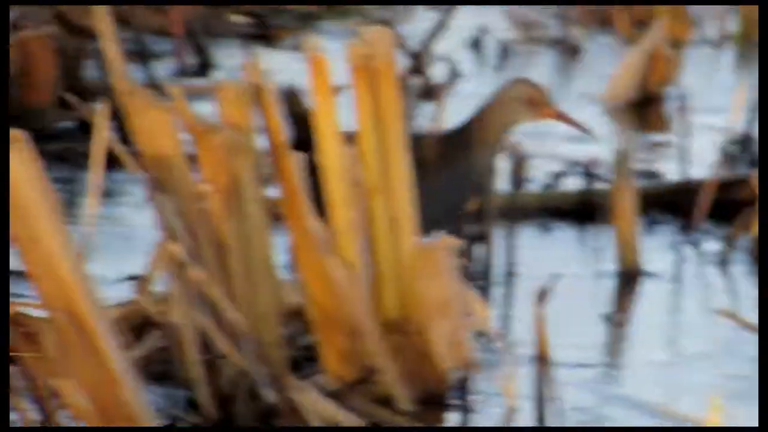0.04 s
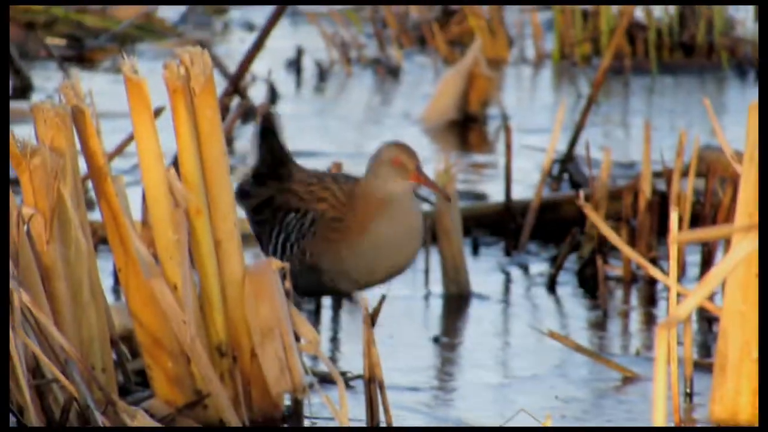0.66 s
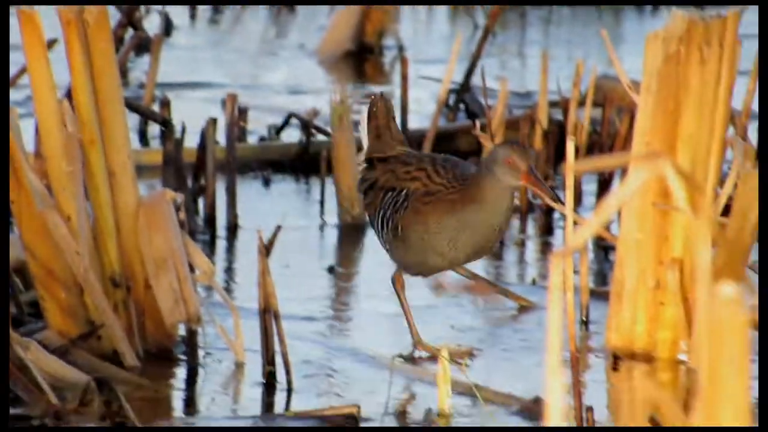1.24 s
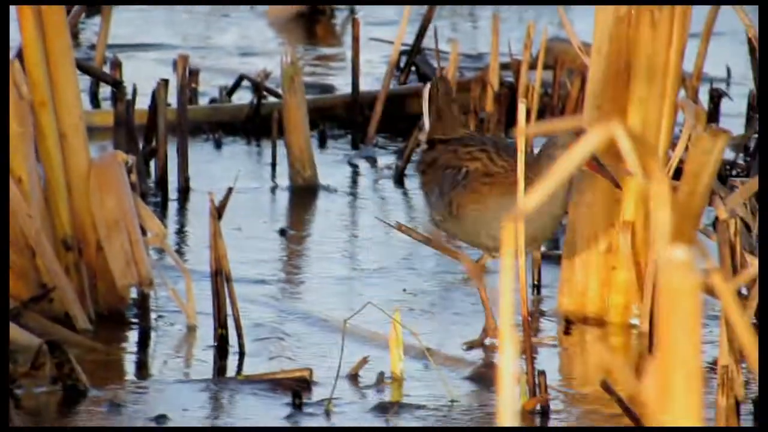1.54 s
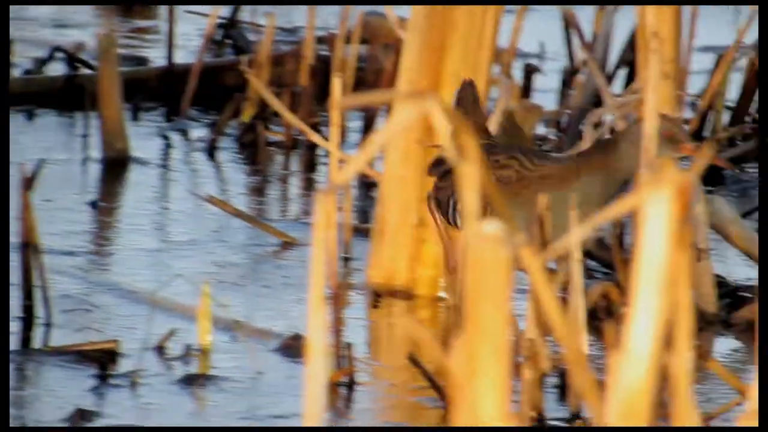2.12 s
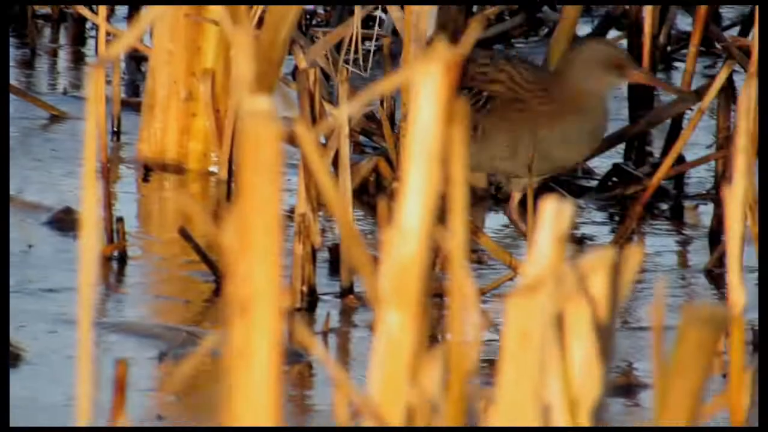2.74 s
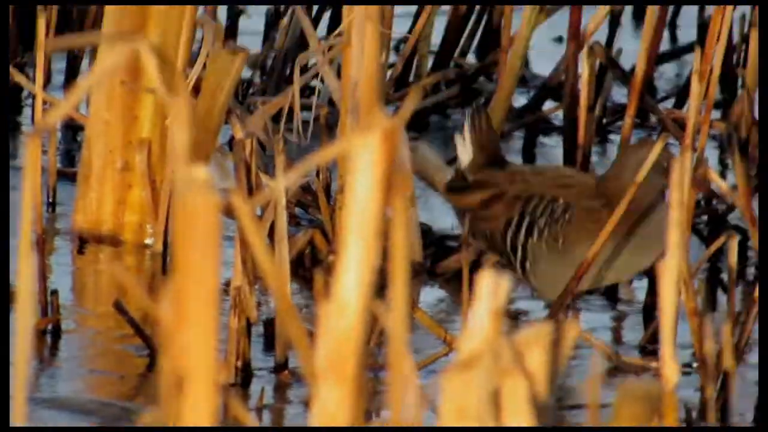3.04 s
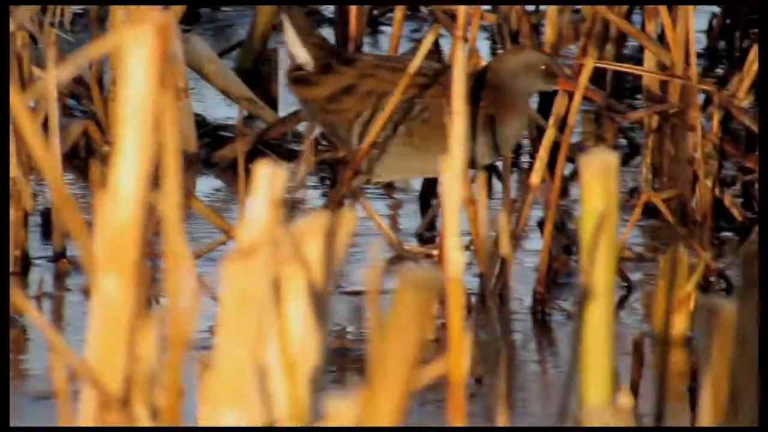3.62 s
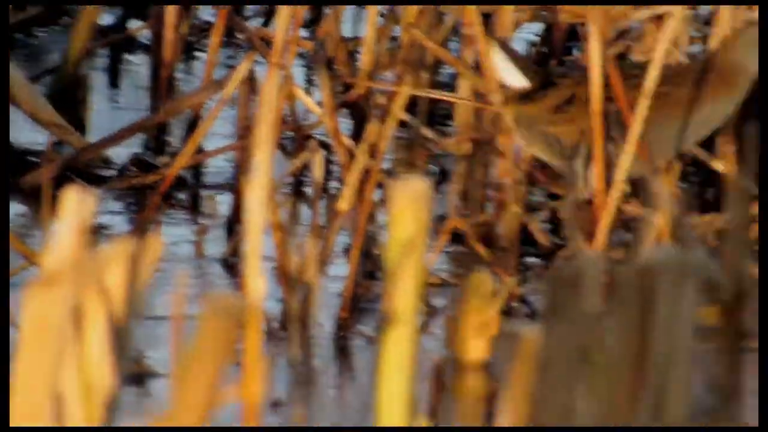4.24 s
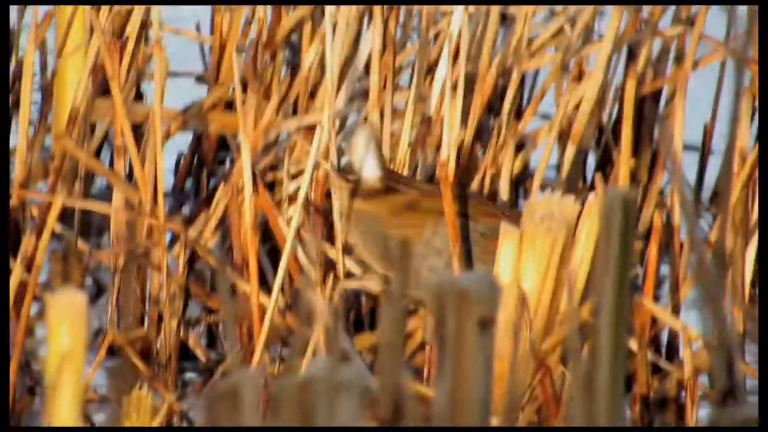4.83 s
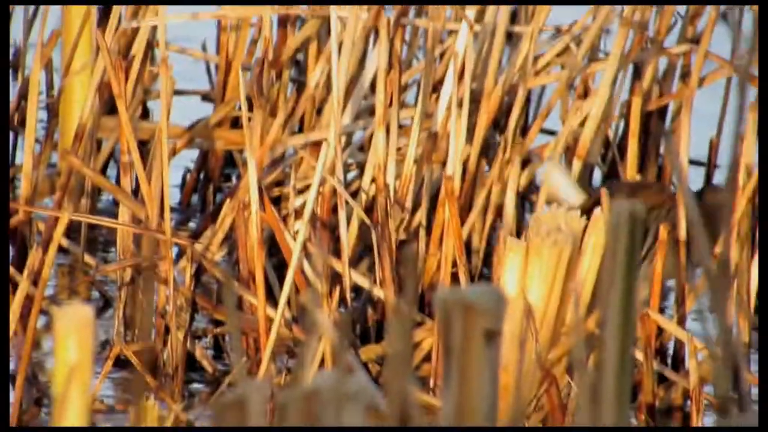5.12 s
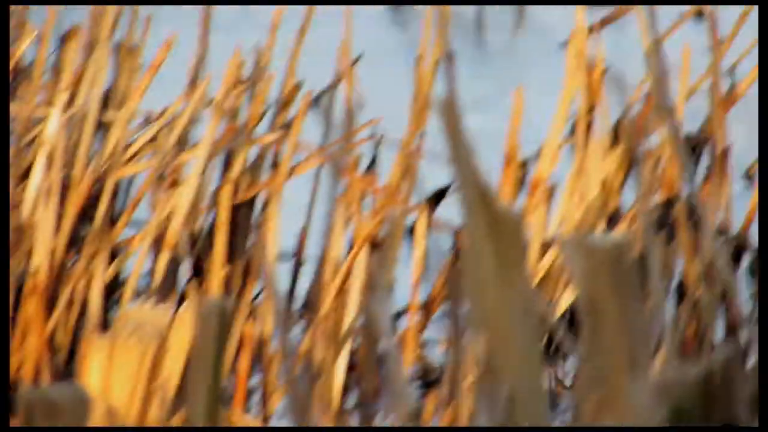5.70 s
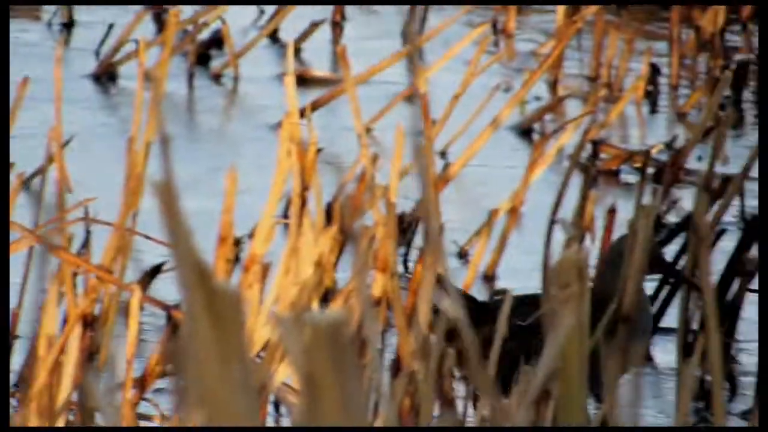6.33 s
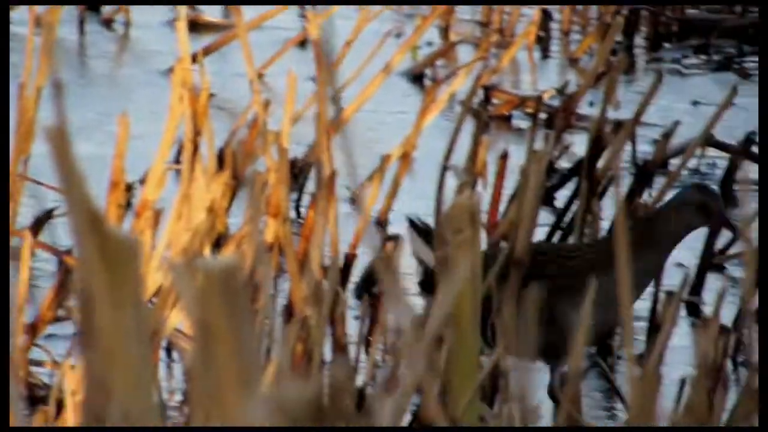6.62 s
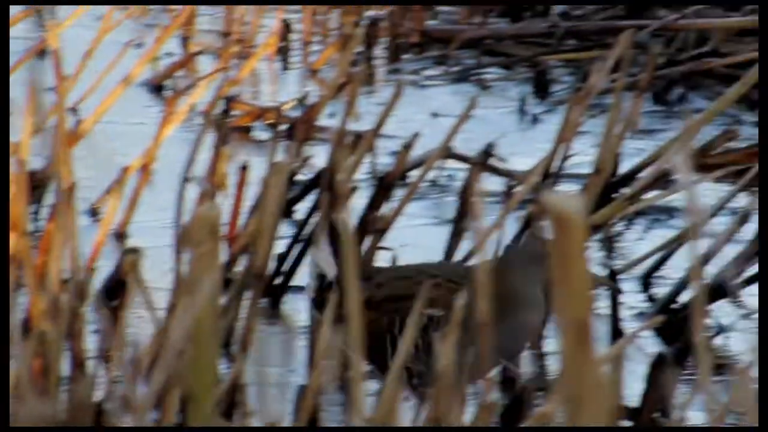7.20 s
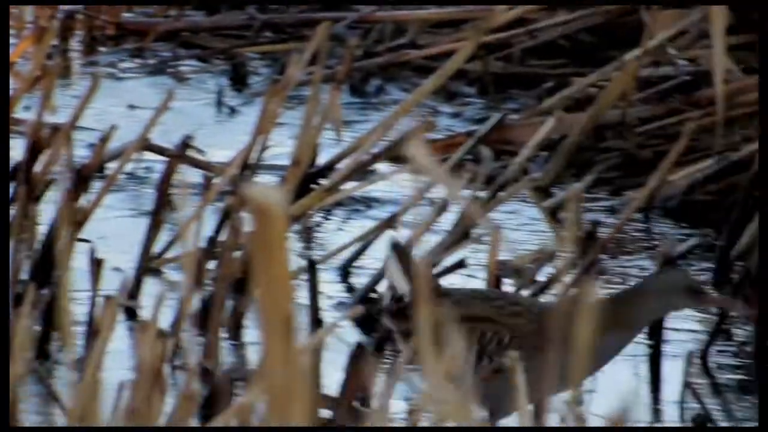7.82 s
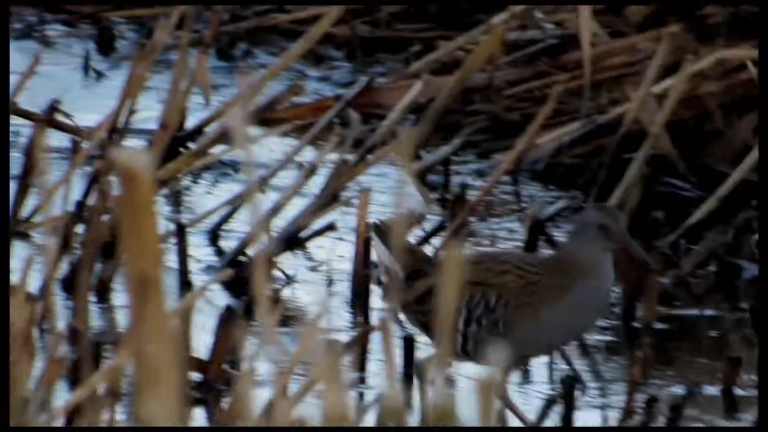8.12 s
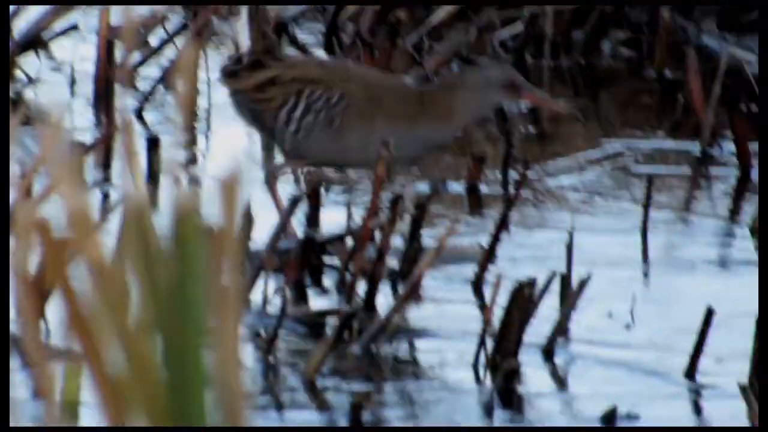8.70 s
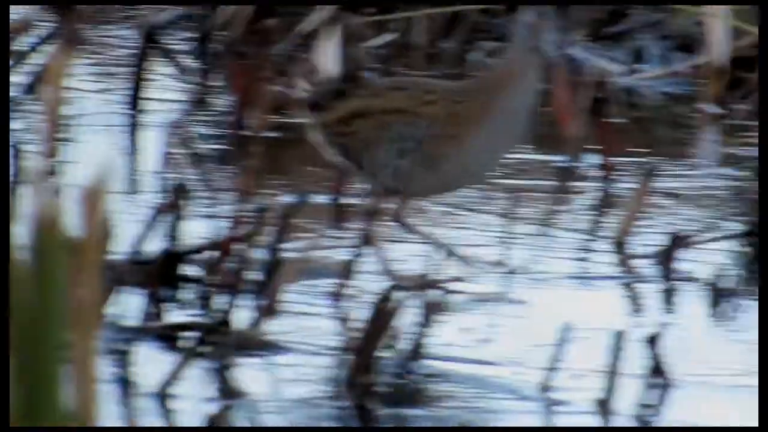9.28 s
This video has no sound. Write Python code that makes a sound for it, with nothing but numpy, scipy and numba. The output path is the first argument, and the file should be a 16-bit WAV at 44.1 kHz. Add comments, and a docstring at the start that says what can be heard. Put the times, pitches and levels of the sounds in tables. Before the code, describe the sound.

Gusty wind buffets the bare microphone of a hand-held camera at the edge of a reed bed. Low, fluttering rumbles and thumps come in uneven bursts, the hardest overloading with sharp cracks. The wind builds in the middle, drops briefly, then returns in close gusts. Underneath are faint hiss, a dull wash of open country, a few dry finger clicks, two soft rustles and barely audible far bird chips.

```python
"""The edge of a reed bed: gusty wind blows over the bare stereo microphone of a hand-held camera.
Eddies push the two ports in opposite directions, smaller and faster in a gust; the hardest ones
overload and crack. Underneath lie microphone hiss, a distant murmur of open country, a few far bird
chips, a lens motor, two brief rustles and the clicks of fingers on the camera."""
import sys
import numpy as np
from scipy import signal
from scipy.fft import rfft, irfft, next_fast_len
from scipy.io import wavfile
from scipy.ndimage import uniform_filter1d
from numba import njit

SR = 44100
rng = np.random.default_rng(int(sys.argv[2]) if len(sys.argv) > 2 else 0)


def dump_mix(stems):
    """Bounce the given channels to the path in sys.argv[1] as a 16-bit WAV at rate SR."""
    frames = np.atleast_2d(stems).T  # one column per channel
    limited = np.clip(frames, -1, 1)  # hard clip at full scale
    pcm = np.round(limited * 32767).astype(np.int16)
    wavfile.write(sys.argv[1], SR, pcm)


N = 421155
TIME = np.arange(N) / SR
APART = np.array([[1], [-1]])  # opposite signs left and right


def undb(db):
    """Decibels to gain."""
    return 10 ** (np.asarray(db) / 20)


def unit(x):
    """Scale to rms 1."""
    return x / np.sqrt(np.mean(x ** 2))


def colour(x, points):
    """EQ by a curve of (freq_hz, gain_db) points."""
    hz, db = np.transpose(points)
    size = next_fast_len(x.shape[-1])
    bin_hz = np.maximum(np.arange(size // 2 + 1) * SR / size, 1)
    gain = undb(np.interp(np.log(bin_hz), np.log(hz), db))
    return irfft(rfft(x, size) * gain, size)[..., :x.shape[-1]]


def wander(rate_hz):
    """Smooth random drift with rms 1."""
    step = int(SR / rate_hz)
    stairs = np.repeat(rng.standard_normal(N // step + 1), step)
    return unit(uniform_filter1d(stairs, step)[:N])


def add(out, start_s, sound):
    """Mix a sound into a stereo track."""
    i = max(int(start_s * SR), 0)
    out[:, i:i + sound.shape[-1]] += sound[..., :N - i]


# The bed ducks where the wind hits hard: start_s, depth_db, recovery_s
BED_DUCKS = [(0.02, 3, 0.27), (0.596, 13, 0.41), (0.836, 7, 0.64), (2.07, 4, 0.58), (3.25, 3, 0.19),
             (3.78, 5, 23), (4.119, 4.5, 1.27), (4.202, 5, 1.1), (4.353, 9, 1.5), (6.74, 10.5, 0.43),
             (6.98, 8, 1.4), (8.055, 4.5, 2.6), (8.53, 7, 4.2)]
# Soft swells of the bed: centre_s, half_width_s, rise_db
BED_SWELLS = [(0.3, 0.059, 3.5), (1.93, 0.091, 3), (3.08, 0.13, 3.5)]


def bed_ride_db(sink_s=0.018):
    """Level ride of the background: quick ducks that creep back up, and smooth swells."""
    ride_db = sum(db * np.exp(-((TIME - s) / width) ** 2) for s, width, db in BED_SWELLS)
    for start, depth, recovery in BED_DUCKS:
        age = np.maximum(TIME - start, 0)
        ride_db -= depth * np.minimum(age / sink_s, 1) * np.exp(-age / recovery)
    return ride_db


# Bright microphone hiss: freq_hz, gain_db
HISS_EQ = [(200, 2), (1500, -1), (3000, 5.5), (5000, 3.5), (7000, 2.5), (9000, -0.5), (12300, -1.5),
           (14000, -9), (15000, -26), (16000, -36.5)]
# Dull murmur of open country: freq_hz, gain_db
COUNTRY_EQ = [(60, 5), (200, -3), (400, 0.5), (700, 2), (1050, 0), (1500, -6), (2400, -15), (8000, -49)]


def background(hiss_db=-59.5, hiss_side_db=2.0, country_db=-48, country_width=0.57, drift_db=1):
    """The bed: wide microphone hiss over the narrower, slowly drifting wash of far country."""
    mid, side = colour(rng.standard_normal((2, N)), HISS_EQ)
    side = colour(side, [(1000, 1.5), (4500, -5.5), (8000, -2.0), (13000, 2.0)])
    hiss = unit(mid + undb(hiss_side_db) * APART * side)
    mid, side = colour(rng.standard_normal((2, N)), COUNTRY_EQ)
    country = unit(mid + country_width * APART * side) * undb(drift_db * wander(1.9))
    return undb(bed_ride_db()) * (undb(hiss_db) * hiss + undb(country_db) * country)


# Far bird chips: start_s, top_pitch_hz, level_db
BIRD_CHIPS = [(0.893, 3550, -68), (3.202, 4630, -54), (6.172, 3150, -62), (6.285, 3550, -60),
              (6.375, 3250, -63)]


def birds(length_s=0.0263, rise=0.15, waver=0.04):
    """Short, slightly hoarse whistles that slide up and level off."""
    out = np.zeros((2, N))
    progress = np.linspace(0, 1, int(length_s * SR))
    for start, top_hz, db in BIRD_CHIPS:
        hz = top_hz * (1 - rise * (1 - progress) ** 2 + waver * wander(490)[:len(progress)])
        phase = 2 * np.pi * np.cumsum(hz) / SR + np.array([[0], [1]])  # right leads by a radian
        add(out, start, undb(db) * np.sin(np.pi * progress) * np.sin(phase))
    return out


# The lens motor nudges the focus: start_s, length_s
FOCUS_NUDGES = [(5.835, 0.06), (5.9, 0.075)]


def lens_motor(drive_hz=3985, drive_db=-62, third_db=-72):
    """Two faint, unsteady pulses of whine on the left: the drive tone and its third harmonic."""
    gate = np.zeros(N)
    for start, length in FOCUS_NUDGES:
        progress = np.clip((TIME - start) / length, 0, 1)
        gate += np.sqrt(np.abs(np.sin(np.pi * progress)))
    phase = 2 * np.pi * drive_hz * TIME + .35 * wander(120)
    whine = undb(drive_db) * np.sin(phase) + undb(third_db) * np.sin(3 * phase)
    return gate * whine * np.array([[1], [.3]])


# Brief rustles: start_s, length_s, level_db
RUSTLES = [(1.728, 0.14, -41), (3.754, 0.21, -46)]
# Their papery midrange: freq_hz, gain_db
RUSTLE_EQ = [(300, -8), (1000, 9.5), (2000, 5), (3000, -8), (4000, -12), (14000, -39)]


def rustles(attack_s=0.00098, grain_db=0.5, width=0.57):
    """Soft grainy scrapes that start at once and fade."""
    envelope = np.zeros(N)
    for start, length, db in RUSTLES:
        age = np.maximum(TIME - start, 0)
        envelope += undb(db) * (1 - np.exp(-age / attack_s)) * np.exp(-2 * age / length)
    mid, side = colour(rng.standard_normal((2, N)), RUSTLE_EQ)
    return envelope * undb(grain_db * wander(200)) * unit(mid + width * APART * side)


# Fingers on the camera body: start_s, level_db (before boost_db)
FINGER_TAPS = [(2.164, -33), (2.336, -39), (2.346, -34.5), (5.357, -50), (6.3679, -29.5), (7.636, -47.5),
               (8.2296, -39), (8.309, -35.5), (8.4, -48), (8.526, -46.5), (8.5599, -52)]
# Tone of the shell: freq_hz, gain_db
SHELL_EQ = [(1200, 4.5), (2200, 6), (3700, -8), (5100, 2), (6500, -7), (9000, -17), (12500, -10),
            (16000, -26)]


def handling_clicks(attack_s=0.00014, decay_s=0.0025, boost_db=4):
    """Dry ticks of the camera's plastic shell."""
    out = np.zeros((2, N))
    age = TIME[:1024]
    envelope = np.exp(-age / decay_s) * (1 - np.exp(-age / attack_s))
    for start, db in FINGER_TAPS:
        tick = colour(rng.standard_normal((2, len(age))), SHELL_EQ) * envelope
        add(out, start, tick / np.abs(tick).max() * undb(db + boost_db))
    return out


# Tearing edge of a gust: freq_hz, gain_db
RASP_EQ = [(800, -22.5), (2000, 2), (3500, 3.5), (5000, -19.5), (9000, -33)]


def rasp(air, eddy_hz, gain_db=-39, gust_hz=250, smear_s=0.0029):
    """Fast gusts tear: a fine, dense crackle that follows their pressure."""
    power = uniform_filter1d(air ** 2, int(smear_s * SR))
    noise = unit(colour(rng.standard_normal((2, N)), RASP_EQ))
    return undb(gain_db) * (eddy_hz / gust_hz) ** 4 * power * noise


# The microphone overloads and cracks: time_s, level_db (before boost_db)
OVERLOAD_CRACKS = [(0.594, -19), (0.5991, -17.5), (0.8355, -12), (3.2297, -21), (4.1193, -24.5),
                   (4.2023, -12), (4.3532, -13.5), (4.596, -40), (4.623, -20.5), (4.8316, -16.5),
                   (6.7447, -25), (6.752, -33), (6.793, -28), (6.963, -25), (7.002, -32), (7.141, -13),
                   (8.0552, -25), (8.8852, -25)]
# Hard midrange bite of a crack: freq_hz, gain_db
CRACK_EQ = [(300, -3), (1500, 21.5), (3000, 11), (5000, 1.5), (9000, -9), (16000, -22)]


def cracks(air, boost_db=1, weak_port_db=-8):
    """The hardest buffets snap: a sharp step in pressure, mostly on the port that is hit harder."""
    out = np.zeros((2, N))
    pulse = signal.hilbert(colour(signal.unit_impulse(512, "mid"), CRACK_EQ))
    edge = pulse.imag / np.abs(pulse).max()  # a quarter-cycle shift turns the spike into an edge
    for s, db in OVERLOAD_CRACKS:
        pressure = air[:, int(s * SR)]
        weaker = np.abs(pressure) < np.abs(pressure).max()
        port_gain = -np.sign(pressure) * np.where(weaker, undb(weak_port_db), 1)
        add(out, s - len(edge) / 2 / SR, port_gain[:, None] * edge * undb(db + boost_db))
    return out


@njit
def eddies(times, hz, size, turn):
    """Pressure of passing vortices: one swing each, tuned to hz; turn (radians) makes it lopsided."""
    out = np.zeros(N)
    for k in range(len(times)):
        centre, reach = times[k] * SR, 1.5 * SR / hz[k]
        even, odd = size[k] * np.cos(turn[k]), size[k] * np.sin(turn[k])
        for i in range(max(int(centre - reach) + 1, 0), min(int(centre + reach), N)):
            u = 2 * np.pi * hz[k] * (i - centre) / SR
            fade = (1 - ((i - centre) / reach) ** 2) ** 3
            out[i] += fade * (even * (1 - u * u) - odd * 2 * u) / (1 + u * u) ** 2
    return out


def ports(times, hz, size, turn, lag_s, lean_db):
    """Each eddy pushes one port and pulls the other, a little apart in time and strength."""
    return np.array([side * eddies(times + side * lag_s, hz, size * undb(side * lean_db / 2), turn)
                     for side in (1, -1)])


def port_leak(x, cutoff_hz=68):
    """The ports leak, so slow pressure swings fade out gently toward the deep bass."""
    leak = signal.butter(1, cutoff_hz, "high", fs=SR, output="sos")
    return signal.sosfilt(leak, signal.sosfilt(leak, x))


def spits(level_db, eddy_hz, count=700, gain_db=-21, spread_db=4, gust_hz=250, faster=2.4, lag_s=.00005):
    """Tiny sharp eddies sputter through the fast gusts; most are faint, a few stand out."""
    place, size, turn, pitch, lean = rng.random((count, 5)).T
    at = (place * N).astype(int)
    accent_db = -spread_db * np.log(np.maximum(size, .05))
    strength = undb(level_db[at] + gain_db + accent_db) * (eddy_hz[at] / gust_hz) ** 2
    hz = faster * eddy_hz[at] * 2 ** ((pitch - .5) / 2)
    return port_leak(ports(TIME[at], hz, strength, 2 * np.pi * turn, lag_s, lean_db=10 * (lean - .5)))


# Thumps of single hard eddies, plus two dull, high-pitched snaps of overload (near 0.825 s and 8.885 s) that
# share their shape: time_s, spike_db, pitch_hz, left_minus_right_db
HARD_EDDIES = [(0.077, 2, 125, -1.5), (0.2811, -7, 180.4, -5), (0.5923, 2.5, 140.3, -2.5),
               (0.5991, -2.5, 231, -3.5), (0.6685, -3.5, 205, -0.5), (0.8252, -12.5, 502, -3.5),
               (0.8272, -3, 192, -2), (0.8314, -5, 188, -3.5), (0.8354, -2.5, 288, -2.5),
               (1.017, -7, 212, -1.5), (1.926, -5.5, 131, -4), (1.96, -1.5, 136, 0),
               (2.0049, -1.5, 153, -2.5), (2.0766, -2, 150, -1), (2.3313, -11, 149, -2),
               (2.914, -4, 142, 0.5), (3.012, -6, 167, 3), (3.194, 1, 159, -1.5), (3.2319, -1.5, 250, 2),
               (3.2864, -5, 196, -1), (3.308, -5, 221, 1.5), (3.7236, 0, 172, 4.5), (3.876, -4.5, 210, 3),
               (4.037, -14, 230, 6.5), (4.05, -10, 297, 6), (4.1192, -7, 300, -4), (4.183, -4, 352, 2),
               (4.2021, 0.5, 346, 3.5), (4.3538, -2, 270, 1.5), (4.596, -6, 255, 10),
               (4.6223, -0.5, 302, 4), (4.8303, -4, 253, 5), (5.0646, -5, 418, 8.5), (5.143, -10, 394, 9.5),
               (5.167, -6.5, 274, 7), (5.3, -13, 330, -10.5), (5.6338, -8.5, 193, 1.5),
               (6.731, -2.5, 190, 4.5), (6.744, -1, 208, 4.5), (6.838, -10, 290, 2), (6.9625, -1, 294, 8.5),
               (7.002, -9, 385, 6.5), (7.132, -3, 217, 2.5), (7.141, 2, 277, 1.5), (7.566, -6.5, 194, 1.5),
               (8.0551, -3, 180, 5.5), (8.1849, -19, 255, 7), (8.3495, -3.5, 192, 3.5),
               (8.401, -6.5, 215, 7.5), (8.4818, -7, 198, 6), (8.5619, -1, 238, 2), (8.603, -8.5, 430, 6.5),
               (8.618, -9, 422, 2), (8.759, -4.5, 320, 4), (8.8288, -9.5, 220, -2), (8.885, -15.5, 598, 13),
               (9.034, -3.5, 165, -1), (9.049, -3, 252, -3.5), (9.355, -24.5, 520, 7),
               (9.366, -9.5, 219.5, 6.5), (9.402, -7.5, 203, 2)]


def buffets(ahead_db=-8, behind_db=-7, ahead_cycles=0.55, behind_cycles=0.28,
            slower=0.76, scatter=0.17, skew=0.12, lag_s=.00008):
    """A narrow pressure spike between two broader swings the other way; no two are quite alike."""
    s, db, hz, lean_db = np.transpose(HARD_EDDIES)
    sign, heading, turn, early, late = rng.standard_normal((len(s), 5)).T
    size = np.sign(sign) * undb(db)
    swings = [(s, hz, size),
              (s - ahead_cycles * np.exp(scatter * early) / hz, slower * hz, -size * undb(ahead_db)),
              (s + behind_cycles * np.exp(scatter * late) / hz, slower * hz, -size * undb(behind_db))]
    lags = lag_s * np.sign(heading)
    return port_leak(sum(ports(*swing, skew * turn, lags, lean_db) for swing in swings))


def thin_out(stream, eddy_hz, boom_hz=125, from_hz=140, share=0.23):
    """Fast air booms less: its weight moves from the upper bass into the low middle."""
    boom = signal.lfilter(*signal.iirpeak(boom_hz, 1, fs=SR), stream)
    return stream - share * np.clip(2 * (eddy_hz / from_hz - 1), 0, 1) * boom


def eddy_stream(level_db, eddy_hz, count=9500, dense_hz=250, pitch_scatter=0.14,
                small_db=-1.5, size_db=1.5, flurry_rate_hz=115, flutter_db=4.4, sputter_hz=182,
                quickening=0.025, lag_s=.000076, uneven_db=3.0, steady_s=0.04, trim_db=-0.11):
    """The wind's body: eddies crowd closer in faster air; each flurry makes them stronger and faster."""
    place, pitch, size, turn, heading, lean = rng.standard_normal((count, 6)).T
    passed = np.cumsum(np.clip(eddy_hz / dense_hz, .4, 1))
    times = np.interp((np.arange(count) + place / 2) / count, passed / passed[-1], TIME)
    at = (times * SR).astype(int)
    typical_hz = np.maximum(eddy_hz[at], 35)
    flurry = wander(flurry_rate_hz)[at]
    flurry = np.minimum(flurry, 1.18 * np.tanh(flurry / 1.29))  # lulls reach further than peaks
    sputter = np.minimum(sputter_hz / typical_hz, 1.49)  # a breeze sputters, a gust rushes more evenly
    flurry_db = flutter_db * sputter * flurry
    detune = pitch_scatter * np.minimum(pitch, 2 * np.tanh(pitch / 2))
    hz = typical_hz * np.exp(detune + quickening * flurry_db)
    # the smallest, fastest eddies carry the least pressure
    eddy_db = size_db * size + flurry_db + small_db * np.maximum(pitch, 0) ** 2
    lags = lag_s * np.sin(2 * np.pi * heading)  # set by the direction an eddy crosses the pair
    stream = port_leak(ports(times, hz, undb(eddy_db), 2 * np.pi * turn, lags, uneven_db * lean))
    stream = thin_out(stream, eddy_hz)
    # even out the stream so that the gusts alone set its slow strength
    span = int(steady_s * SR)
    power = uniform_filter1d(uniform_filter1d(np.mean(stream ** 2, axis=0), span), span // 2)
    return stream / np.sqrt(power + 1e-12) * undb(level_db + trim_db)


# Gusts at the ports: start_s, hold_s, level_db, eddy_pitch_hz
GUSTS = [(0.034, 0.14, -17, 99.49), (0.278, 0.06, -14.5, 110.9), (0.497, 0.053, -10.5, 120.1),
         (0.592, 0.22, -19.5, 157.8), (0.984, 0.14, -30, 108.9), (1.78, 0.089, -21, 123.2),
         (1.922, 0.17, -17, 120.2), (2.244, 0.1, -23, 113.8), (2.5, 0.35, -29, 101.9),
         (2.823, 0.11, -17, 142.2), (2.989, 0.018, -17, 117), (3.119, 0.036, -18, 132.7),
         (3.185, 0.11, -18.5, 161.9), (3.35, 0.18, -28, 118.1), (3.602, 0.12, -17, 121.1),
         (3.759, 0.16, -29.5, 147.8), (3.862, 0.15, -18.5, 166.1), (4.047, 0.084, -12, 189.3),
         (4.136, 0.05, -11.5, 270.1), (4.256, 0.18, -16, 280.8), (4.476, 0.063, -17, 262.3),
         (4.523, 0.11, -15.5, 226.7), (4.667, 0.18, -20, 192.6), (4.868, 0.15, -22, 197.3),
         (4.995, 0.075, -15, 216), (5.096, 0.081, -14.5, 231.2), (5.202, 0.034, -17, 203.2),
         (5.263, 0.11, -16, 157.8), (5.383, 0.12, -23.5, 117), (5.568, 0.28, -25.5, 101.9),
         (5.806, 0.05, -17, 134.4), (5.895, 0.073, -24.5, 132.7), (6.027, 0.073, -27.5, 67.6),
         (6.15, 0.2, -38.5, 57.6), (6.555, 0.18, -32.5, 62.7), (6.73, 0.016, -10, 169.7),
         (6.761, 0.032, -11, 242.2), (6.877, 0.11, -14, 275.5), (7.005, 0.016, -18.5, 242.8),
         (7.026, 0.14, -24, 176.6), (7.204, 0.24, -21, 152.5), (7.439, 0.023, -22.5, 128.1),
         (7.553, 0.018, -15.5, 145.8), (7.602, 0.18, -29, 118.9), (7.744, 0.083, -16.0, 170.5),
         (7.838, 0.1, -22, 165.2), (8.015, 0.38, -14.5, 176.1), (8.447, 0.12, -14.5, 204.3),
         (8.589, 0.048, -14.5, 278.1), (8.658, 0.063, -19, 227.1), (8.724, 0.031, -13, 265.5),
         (8.81, 0.088, -13.5, 234.8), (8.912, 0.05, -21.5, 189.9), (8.992, 0.063, -15, 176.3),
         (9.11, 0.043, -13, 209.6), (9.215, 0.076, -13, 195.2), (9.339, 0.1, -15.5, 195.4),
         (9.47, 0.06, -15, 176.7)]


def airflow(breeze_db=-48.5, breeze_hz=55, rise_db_per_s=489, fall_db_per_s=242, octaves_per_db=0.0462):
    """Level and eddy pitch of the wind: gusts hit fast over a breeze, then fade and drop in pitch."""
    power = np.full(N, undb(breeze_db) ** 2)
    weighted_hz = power * breeze_hz  # the strongest gust dominates the pitch
    for start, hold, db, hz in GUSTS:
        fade_db = rise_db_per_s * np.maximum(start - TIME, 0)
        fade_db += fall_db_per_s * np.maximum(TIME - start - hold, 0)
        audible = fade_db < 60
        gust_power = undb(db - fade_db[audible]) ** 2
        power[audible] += gust_power
        weighted_hz[audible] += gust_power * hz * 2 ** (-octaves_per_db * fade_db[audible])
    return 10 * np.log10(power), weighted_hz / power


# The wind shifts from one port to the other: time_s, left_minus_right_db
WIND_PAN = [(0, -0.5), (.8, -1.5), (2.7, -2.5), (3.2, 2.5), (3.8, -0.24), (9.55, 1.46)]


def wind_on_microphone(level_db, eddy_hz, knee=8):
    """Stream, spits and buffets lean across the ports; overload rounds their peaks at full scale."""
    air = eddy_stream(level_db, eddy_hz) + spits(level_db, eddy_hz) + buffets()
    pan_db = np.interp(TIME, *np.transpose(WIND_PAN))
    air *= undb(APART * pan_db / 2)
    return air / (1 + np.abs(air) ** knee) ** (1 / knee)


def treble_notches(x, centres_hz=(3950, 7900), width_hz=330):
    """Scoop out two narrow treble bands."""
    for hz in centres_hz:
        x = signal.lfilter(*signal.iirnotch(hz, hz / width_hz, fs=SR), x)
    return x


def scene():
    """Wind on the ports over the quiet marsh; only cracks and clicks bypass the notches."""
    level_db, eddy_hz = airflow()
    air = wind_on_microphone(level_db, eddy_hz)
    mix = air + rasp(np.tanh(air), eddy_hz) + rustles() + birds() + lens_motor() + background()
    return treble_notches(mix) + cracks(air) + handling_clicks()


def record(dry):
    """The camera stops at full scale and cuts the top above 15750 Hz."""
    high_cut = signal.ellip(8, .2, 70, 15750, fs=SR, output="sos")
    return signal.sosfilt(high_cut, np.clip(dry, -1, 1))


dry = scene()
out = record(dry)
dump_mix(out)
```